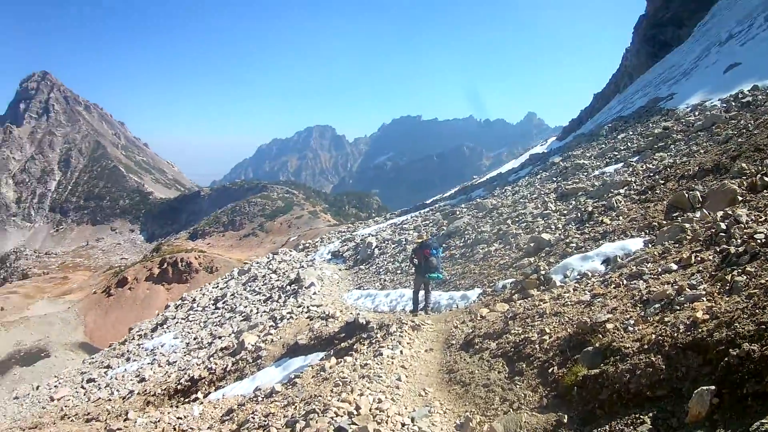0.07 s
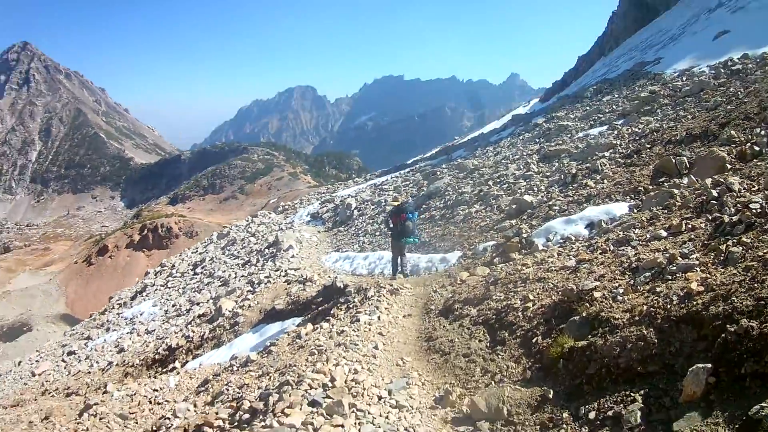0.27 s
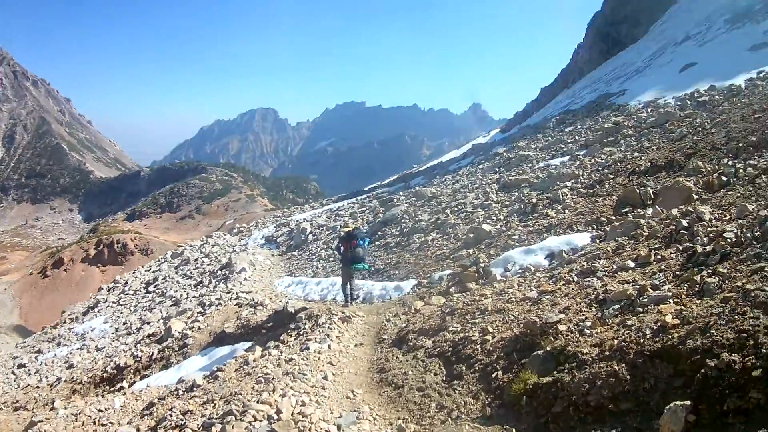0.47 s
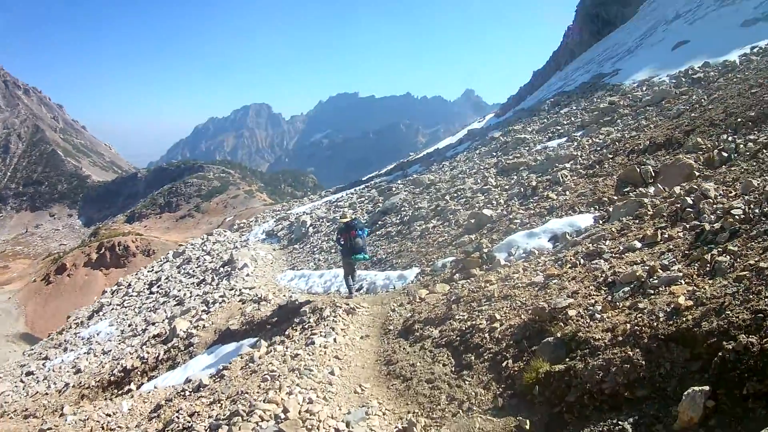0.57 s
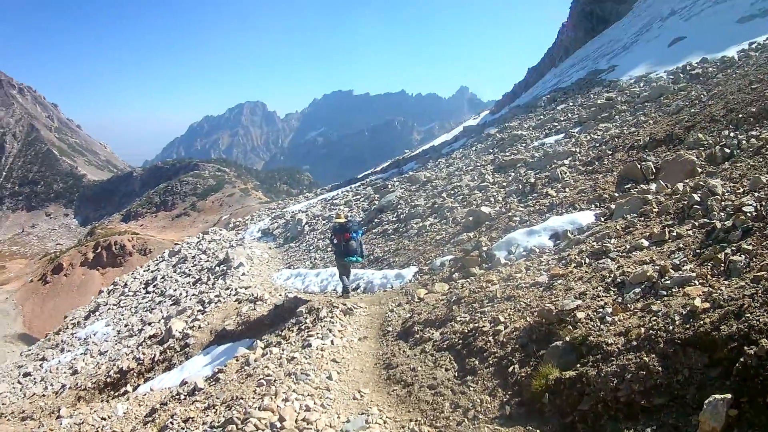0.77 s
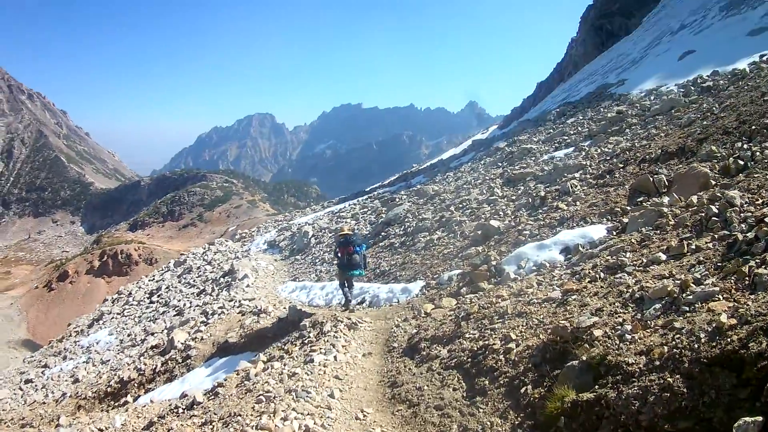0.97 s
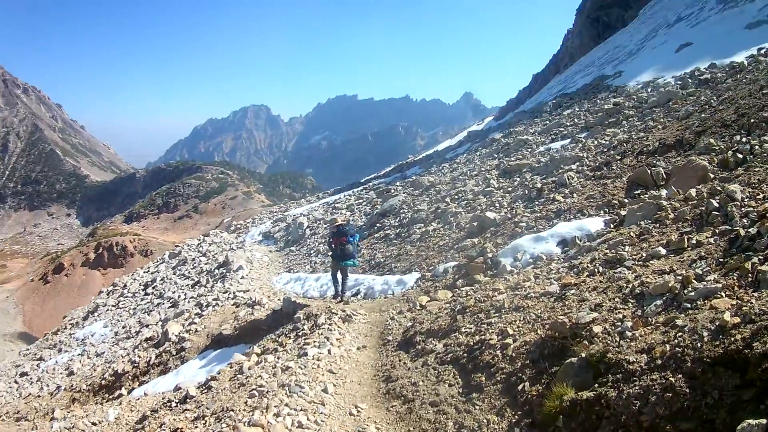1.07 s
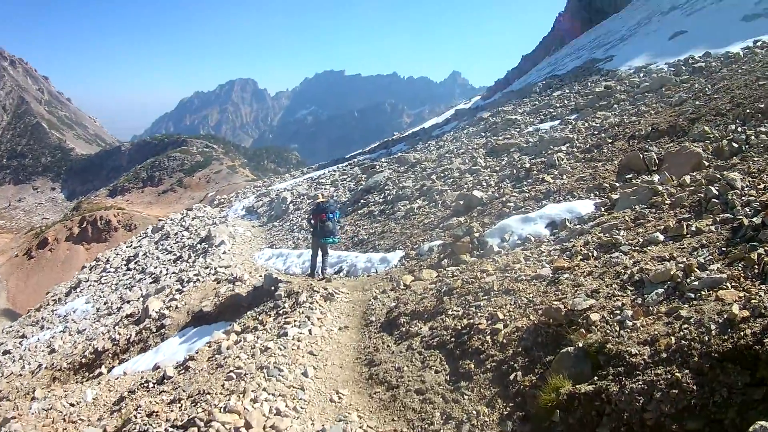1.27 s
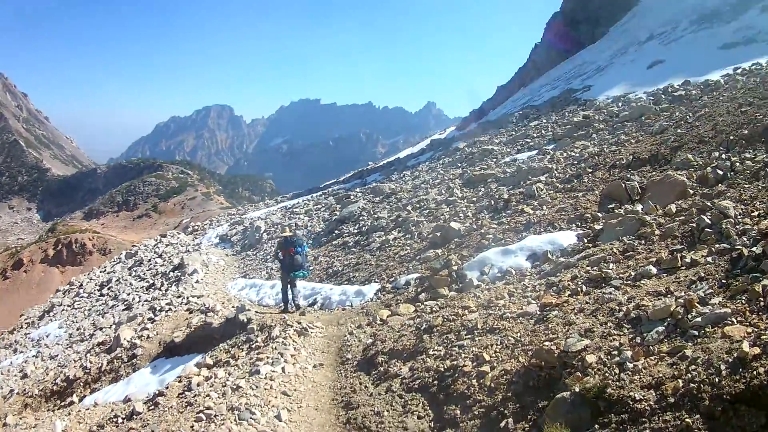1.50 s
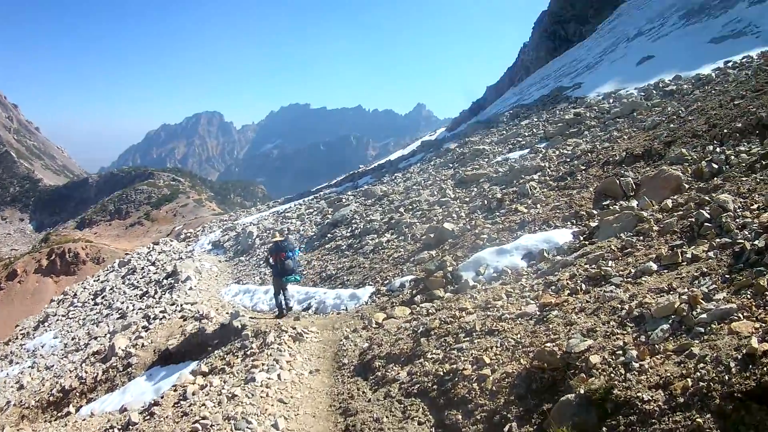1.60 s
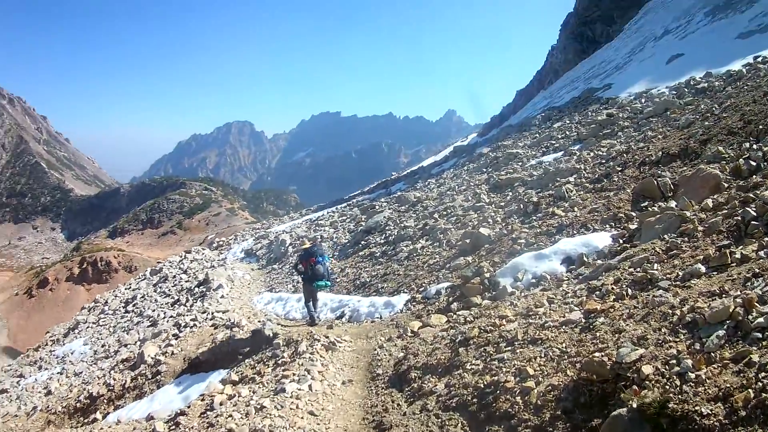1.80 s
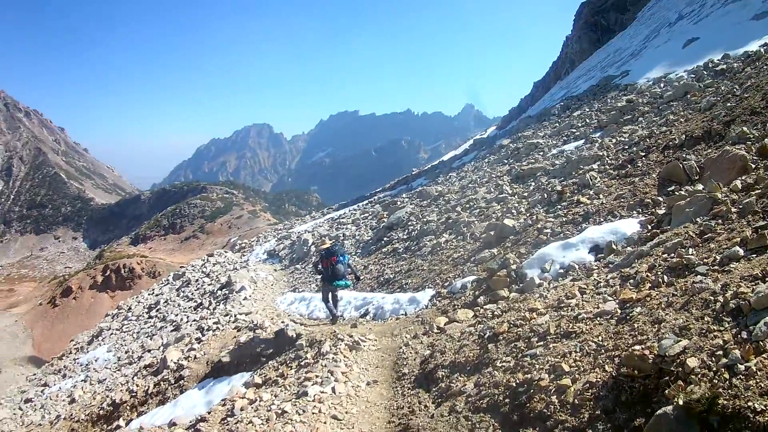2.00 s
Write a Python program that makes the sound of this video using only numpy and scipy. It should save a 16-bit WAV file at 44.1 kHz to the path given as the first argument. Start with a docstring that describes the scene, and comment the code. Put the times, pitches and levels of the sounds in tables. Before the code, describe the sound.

Footsteps crunch on loose gravel, stones knocking dully and small chips clicking, with the heaviest step near the middle; low wind rumbles and bumps a close handheld microphone in the open, growing stronger in the second half.

```python
"""Footsteps cross loose scree on a mountain trail: each boot press grinds a spray of gravel grains,
built from dense random impulses through coloured filters and pebbles ticking as damped sines.
Wind rumbles, flutters and bumps at the microphone as noise that follows the gusts, over a faint hiss.
Larger stones knock dully as heavily damped swings; sharp chips click as noise bursts with ringing modes."""
import sys
import numpy as np
from scipy import signal
from scipy.io import wavfile
from scipy.ndimage import uniform_filter1d

SR = 44100
rng = np.random.default_rng(int(sys.argv[2]) if len(sys.argv) > 2 else 0)


def wav_record(signal):
    """Record a signal, one row per channel, as 16-bit PCM in the file named by sys.argv[1]."""
    frames = np.transpose(np.atleast_2d(signal))
    bounded = np.clip(frames, -1, 1)
    # unit amplitude maps onto the largest positive 16-bit level
    quanta = np.round(bounded * 32767).astype(np.int16)
    wavfile.write(sys.argv[1], SR, quanta)


N = 90404
T = np.arange(N) / SR  # time in seconds


def amp(db):
    """Logarithmic level: decibels become a linear amplitude factor."""
    return 10 ** (np.asarray(db) / 20)


def unit(x):
    """Power normalisation: scales a signal to rms 1."""
    return x / np.sqrt(np.mean(x ** 2) + 1e-20)


def colour(x, spectrum):
    """Minimum-phase filtering: the log gain fixes the phase, so onsets stay sharp; the result has rms 1."""
    hz, db = np.transpose(spectrum)
    log_bin_hz = np.log(abs(np.fft.fftfreq(N, 1 / SR)) + 1)
    log_gain = np.log(amp(np.interp(log_bin_hz, np.log(hz), db)))
    response = np.exp(np.conj(signal.hilbert(log_gain)))
    return unit(np.fft.ifft(np.fft.fft(x) * response).real)


def noise(spectrum):
    """Stationary random noise: white noise shaped by a spectrum."""
    return colour(rng.standard_normal(N), spectrum)


def grains(spectrum, per_s, spread_db):
    """Shot noise: random tiny impacts of uneven size and either sign, all of one colour."""
    size = amp(spread_db * np.minimum(rng.exponential(1, N), 3))
    sign = rng.choice([-1, 1], N)
    hit = rng.random(N) < per_s / SR
    return colour(size * sign * hit, spectrum)


def decay(start, t60):
    """Exponential decay: sudden onset, then a fall of 60 dB in t60 seconds."""
    return (T >= start) * np.exp(-np.log(1000) * np.maximum(T - start, 0) / t60)


def wavelet(s, hz, rise, fall):
    """Heavy damping: a short swing of random phase peaking at time s; rise and fall are in cycles."""
    cycles = (T - s) * hz
    before = (np.minimum(cycles, 0) / rise) ** 2
    after = np.hypot(1, np.maximum(cycles, 0) * 2 / fall)
    return np.exp(1 - before - after) * np.cos(2 * np.pi * (cycles + rng.random()))


PEBBLE_LOW_HZ, PEBBLE_HIGH_HZ = 925, 4190
PEBBLES_PER_S, PEBBLE_DECAY_CYCLES, PEBBLE_DB_PER_OCTAVE = 420, 2.5, -4


def pebbles(count=24):
    """Damped resonance: pebbles of many sizes tick at random; small ones are higher and quieter."""
    out, t = np.zeros(N), T[:2048]
    for hz in np.geomspace(PEBBLE_LOW_HZ, PEBBLE_HIGH_HZ, count):
        envelope = (1 - np.exp(-2 * hz * t)) * np.exp(-hz * t / PEBBLE_DECAY_CYCLES)
        tick = envelope * np.sin(2 * np.pi * hz * t)
        strength = 2 * rng.random(N) - 1
        hits = strength * (rng.random(N) < PEBBLES_PER_S / count / SR)
        tilt_db = PEBBLE_DB_PER_OCTAVE * np.log2(hz / PEBBLE_LOW_HZ)
        out += amp(tilt_db) * signal.oaconvolve(hits, tick)[:N]
    return unit(out)


# Boots pressing into gravel. Each row: start in seconds, hold in seconds, level in dB before the layer
# gains, sag over the hold in dB (negative swells), fine grit in dB re level, pebbles in dB re level.
BOOT_PRESSES = [(-.01, 0.13, -43.5, 5, -4.5, -3), (0.376, 0.16, -49.5, -7, -1, -9),
                (0.704, 0.11, -49.5, 23, -2, -4), (0.853, 0.057, -52.5, 0, -5, -4),
                (0.899, 0.048, -33, 5, -29, -1.5), (0.97, 0.063, -43.5, 4, 0, -3),
                (1.107, 0.061, -39.5, 15.5, -24, -8), (1.309, 0.091, -51, 8, -10, -2),
                (1.385, 0.15, -51.5, -3.5, -12.5, -2), (1.621, 0.084, -54, 0.5, -3.5, -12),
                (1.711, 0.074, -45.5, -6.5, -36, -14), (1.9, 0.13, -44.5, 0, -5, 1)]
# Spectrum of coarse gravel. Each row: frequency in Hz, relative density in dB per Hz.
GRAVEL_SPECTRUM = [(30, -32.5), (200, -0.5), (450, 3.5), (800, 3), (1100, -5.5), (1450, -1), (2200, -16),
                   (3500, -26), (6000, -34), (12000, -42)]
# Spectrum of fine grit. Each row: frequency in Hz, relative density in dB per Hz.
GRIT_SPECTRUM = [(100, 5), (1000, 4.5), (2000, -1), (2900, 1.5), (4100, 0.5), (4700, -6), (6000, -6.5),
                 (7800, -22), (9000, -16), (12000, -28)]
PRESS_S, RELEASE_T60 = 0.014, 0.13  # both in seconds
GRAVEL_PER_S, GRIT_PER_S = 900, 2000  # impacts per second
GRAVEL_DB, PEBBLE_DB, GRIT_DB = -4.5, -6, -8.5  # layer gains
SETTLE_DB, SETTLE_PEBBLE_DB, SETTLE_GRIT_DB = -64.5, -64, -62  # steady floors before the layer gains


def crunch():
    """Granular friction: gravel, pebbles and grit grind under each boot and keep settling between steps."""
    coarse, loose, fine = amp(SETTLE_DB), amp(SETTLE_PEBBLE_DB), amp(SETTLE_GRIT_DB)
    for s, hold, db, sag_db, grit_db, pebble_db in BOOT_PRESSES:
        attack = np.clip((T - s) / PRESS_S, 0, 1)
        sag = amp(db - sag_db * np.clip((T - s) / hold, 0, 1))
        release = np.exp(-np.log(1000) * np.maximum(T - s - hold, 0) / RELEASE_T60)
        press = attack * sag * release
        coarse = coarse + press
        loose = loose + press * amp(pebble_db)
        fine = fine + press * amp(grit_db)
    gravel = coarse * amp(GRAVEL_DB) * grains(GRAVEL_SPECTRUM, GRAVEL_PER_S, spread_db=4)
    grit = fine * amp(GRIT_DB) * grains(GRIT_SPECTRUM, GRIT_PER_S, spread_db=2.0)
    return gravel + loose * amp(PEBBLE_DB) * pebbles() + grit


# Wind strength at the microphone. Each row: time in seconds, level in dB before the rumble gain.
GUST_LEVELS = [(0, -42.5), (.06, -44.5), (.12, -45.5), (.16, -50.5), (.26, -46.5), (.30, -79), (.36, -70),
               (.42, -41.5), (.49, -50), (.58, -50), (.61, -35.5), (.67, -45.5), (.71, -35.5), (.79, -34.5),
               (.87, -37.5), (.92, -26), (1.05, -30.5), (1.26, -33.5), (1.33, -44.5), (1.42, -40),
               (1.50, -42), (1.56, -36.5), (1.66, -38), (1.78, -29), (1.83, -34.5), (1.905, -43),
               (1.945, -30.5), (2.05, -28.5)]
# Spectrum of the rumble. Each row: frequency in Hz, relative density in dB per Hz.
RUMBLE_SPECTRUM = [(10, -26), (25, -2.5), (48, -7), (90, 0), (140, -5.5), (220, -13), (400, -27.5),
                   (700, -44.5), (1200, -46.5), (3000, -65), (12000, -67)]
# Spectrum of the higher flutter. Each row: frequency in Hz, relative density in dB per Hz.
FLUTTER_SPECTRUM = [(20, -32), (120, -4), (220, -1), (400, -5), (700, -16), (1200, -28), (3000, -41.5),
                    (7500, -56), (9500, -51), (12000, -52)]
# Low bumps on the microphone. Each row: peak time in seconds, level in dB, pitch in Hz.
MICROPHONE_BUMPS = [(.062, -32.5, 143), (0.198, -31, 106), (0.242, -35.5, 153), (.298, -41, 55),
                    (0.61, -34.5, 177), (0.768, -23.5, 180), (0.7965, -20, 148), (0.911, -25, 232),
                    (.928, -22, 225), (0.9434, -19, 66), (1.037, -22, 167), (1.08, -22.5, 273),
                    (1.117, -20.5, 208), (1.179, -22.5, 55.6), (1.2224, -19.5, 191), (1.2548, -29, 69.5),
                    (1.297, -27, 151), (1.5497, -19.5, 222), (1.557, -24.5, 84.4), (1.7439, -21.5, 194),
                    (1.7756, -19, 271), (1.7943, -22, 57.4), (1.9526, -22, 108), (1.9996, -24, 196)]
RUMBLE_DB, LUMP_DB = -0.5, 1  # LUMP_DB is the rms swing of the level
# the flutter has FLUTTER_DB at a strong gust and grows by FLUTTER_GROWTH dB per dB of gust
FLUTTER_DB, FLUTTER_GROWTH, STRONG_GUST_DB = -38.5, 1.23, -31
BUMP_CYCLES = 0.46  # rise and fall


def wind():
    """Turbulent pressure: lumpy rumble follows the gusts; flutter grows faster than they do; bumps stand out."""
    low_pass = signal.butter(2, 40, fs=SR, output="sos")
    padded = rng.standard_normal(N + 2 * SR)  # a spare second at each end hides the filter's edges
    lumps = unit(signal.sosfiltfilt(low_pass, padded)[SR:SR + N])
    gust_db = np.interp(T, *np.transpose(GUST_LEVELS))
    rumble = noise(RUMBLE_SPECTRUM) * amp(RUMBLE_DB + gust_db)
    flutter_db = FLUTTER_DB + FLUTTER_GROWTH * (gust_db - STRONG_GUST_DB)
    flutter = noise(FLUTTER_SPECTRUM) * amp(flutter_db)
    bumps = sum(amp(db) * wavelet(s, hz, BUMP_CYCLES, BUMP_CYCLES) for s, db, hz in MICROPHONE_BUMPS)
    return (rumble + flutter) * unit(amp(LUMP_DB * lumps)) + bumps


# Spectrum of the faint hiss. Each row: frequency in Hz, relative density in dB per Hz.
AIR_SPECTRUM = [(20, 9), (100, 2.5), (300, -12.5), (800, -12), (1500, -12), (2300, -17), (4000, -19),
                (4800, -26.5), (6500, -31), (7800, -32.5), (9000, -30), (12000, -32)]


def air():
    """Stationary background: a faint steady noise of the open air."""
    return amp(-56) * noise(AIR_SPECTRUM)


# Larger stones knocking together. Each row: peak time in seconds, level in dB, pitch in Hz.
STONE_KNOCKS = [(.033, -31.5, 830), (.068, -41.5, 654), (.081, -43, 1000), (0.3302, -32, 790),
                (0.4142, -29.5, 556), (0.4239, -28.5, 1050), (.455, -37, 700), (0.4674, -27.5, 690),
                (.4902, -30.5, 546), (.513, -23.5, 820), (0.5212, -21, 740), (.5259, -21.5, 730),
                (0.577, -36.5, 900), (.7697, -32, 507), (.8759, -27.5, 468), (.9066, -44, 660),
                (.9134, -17.5, 500), (.9249, -18, 595), (.9321, -25.5, 880), (0.9391, -22, 480),
                (.9545, -27, 710), (0.9624, -26, 534), (.9896, -31, 834), (1.018, -20.5, 444),
                (1.0815, -26, 560), (1.1176, -26.5, 546), (1.1357, -29, 680), (1.1724, -28, 487),
                (1.2186, -32.5, 500), (1.4019, -34, 507), (1.448, -43, 830), (1.469, -33, 950),
                (1.5488, -22.5, 734), (1.563, -29, 480), (1.632, -40.5, 786), (1.704, -30.5, 796),
                (1.7258, -34.5, 690), (1.7413, -27, 530), (1.7536, -24.5, 676), (1.777, -26.5, 480),
                (1.8848, -33, 1000), (1.9511, -24.5, 770), (1.9822, -28, 1130), (2.0192, -31, 1070)]
KNOCK_RISE_CYCLES, KNOCK_FALL_CYCLES = 0.91, 0.49
THUD_DB, THUD_PITCH_RATIO = -12, 0.53  # re the knock
SHAKE_DB, SHAKE_T60 = -12.5, 0.031  # dB re the knock, seconds


def knocks():
    """Damped impact: bedded stones swing for a cycle or two, thud into the ground and shake the gravel."""
    body, thud, shake = np.zeros(N), np.zeros(N), np.zeros(N)
    for s, db, hz in STONE_KNOCKS:
        body += amp(db) * wavelet(s, hz, KNOCK_RISE_CYCLES, KNOCK_FALL_CYCLES)
        thud += amp(db) * wavelet(s, hz * THUD_PITCH_RATIO, BUMP_CYCLES, BUMP_CYCLES)
        shake += amp(db) * decay(s, SHAKE_T60)
    shaken_gravel = uniform_filter1d(shake, size=120) * noise(GRAVEL_SPECTRUM)  # softened onsets
    return body + amp(THUD_DB) * thud + amp(SHAKE_DB) * shaken_gravel


# Sharp chips snapping. Each row: start in seconds, level in dB, ring T60 in seconds,
# glassy top in dB re level before a further 14 dB cut, pitch in Hz, ring in dB re level.
CHIP_SNAPS = [(0.0331, -38, 0.012, -14, 1600, -1), (0.2749, -41, 0.024, 8, 2750, -9.5),
              (0.327, -58, 0.023, 15, 4300, -11), (0.4127, -38.5, 0.029, -11, 3284, -0.5),
              (0.42, -34, 0.023, -6, 1590, -3.5), (0.467, -42, .03, -12, 1850, -5),
              (.5135, -39.5, 0.034, 9.5, 1460, -3), (.521, -39.5, 0.023, -11, 4040, -3),
              (0.671, -46, 0.0079, -12, 2940, -17), (0.6954, -39.5, 0.015, -16, 1480, -3),
              (0.781, -42.5, 0.037, -9, 3500, -17.5), (0.9117, -40, 0.022, -24, 3380, -8),
              (0.9308, -27, 0.0083, -19, 2050, -8), (.997, -42.5, 0.021, 9.5, 3080, -5),
              (1.208, -45, 0.01, -1, 3900, -6), (1.3996, -39.5, 0.022, -2, 3460, -9),
              (1.701, -42.5, 0.031, -15, 2720, -8), (1.92, -46, 0.024, -10, 2500, -9)]
# Spectrum of a chip's body. Each row: frequency in Hz, relative density in dB per Hz.
CHIP_BODY_SPECTRUM = [(100, -41), (900, 2), (1700, 2.5), (2400, 1), (3300, 1), (4300, -2), (6000, -15.5),
                      (7500, -49), (12000, -17)]
# Spectrum of a chip's glassy top. Each row: frequency in Hz, relative density in dB per Hz.
CHIP_TOP_SPECTRUM = [(100, -55), (3000, -22), (4500, 5.5), (6000, -1), (7800, -8.5), (10000, -8.5),
                     (12000, -28)]
# Modes of a stone flake. Each row: multiple of its pitch, level in dB.
FLAKE_MODES = [(1.001, 4.5), (1.27, -11), (1.62, -13)]
CHIP_RISE_S = 0.001


def chips():
    """Modal vibration: small flakes snap as noise and ring in inharmonic modes at their own pitch."""
    body, top, out = noise(CHIP_BODY_SPECTRUM), amp(-14) * noise(CHIP_TOP_SPECTRUM), np.zeros(N)
    for s, db, t60, top_db, hz, ring_db in CHIP_SNAPS:
        ring = np.zeros(N)
        for ratio, mode_db in FLAKE_MODES:
            ring += amp(mode_db) * np.sin(2 * np.pi * (hz * ratio * (T - s) + rng.random()))
        envelope = np.clip((T - s) / CHIP_RISE_S, 0, 1) * decay(s, t60)
        out += amp(db) * envelope * (body + amp(top_db) * top + amp(ring_db) * ring)
    return out


def scene():
    """Linear superposition: steps, wind, air, stones and chips add as one channel."""
    return (crunch() + wind() + air() + knocks() + chips())[None]


def record(dry):
    """Band limitation: a linear-phase low-pass at 12 kHz stands for the recorder."""
    low_pass = signal.firwin(801, 12000, window=("kaiser", 9), fs=SR)
    return signal.oaconvolve(dry, low_pass[None], "same")


dry = scene()
out = record(dry)
wav_record(out)
```